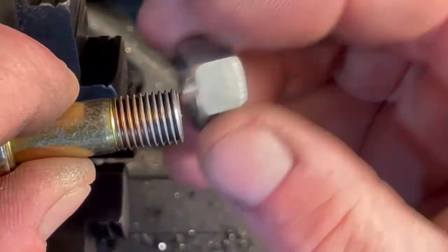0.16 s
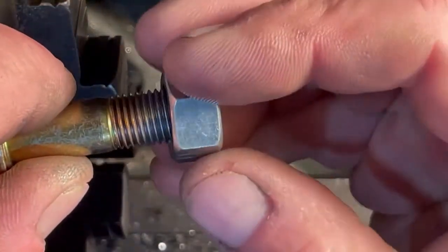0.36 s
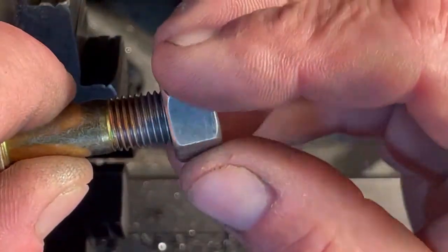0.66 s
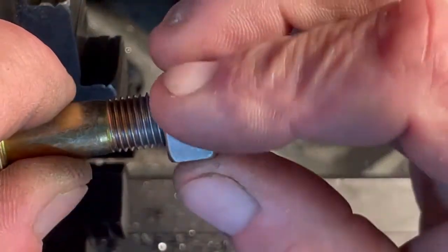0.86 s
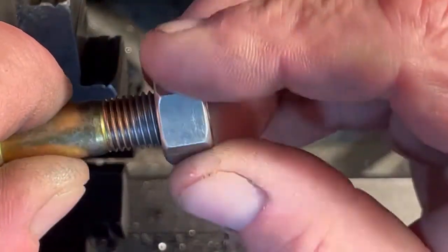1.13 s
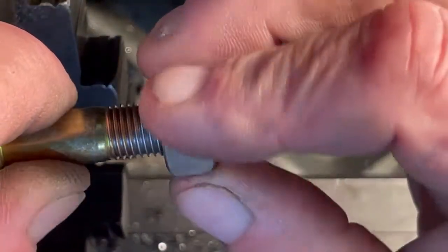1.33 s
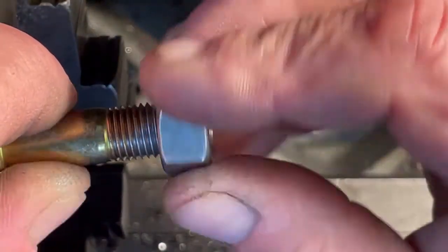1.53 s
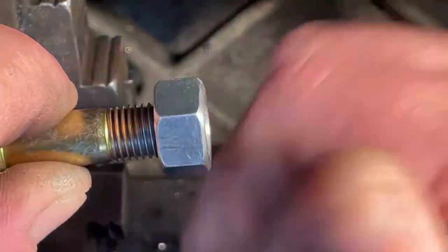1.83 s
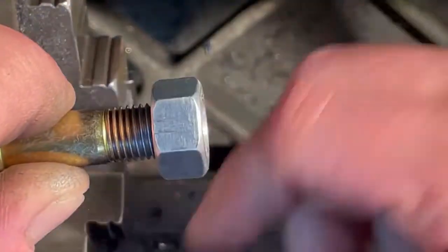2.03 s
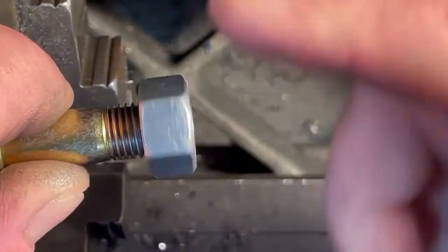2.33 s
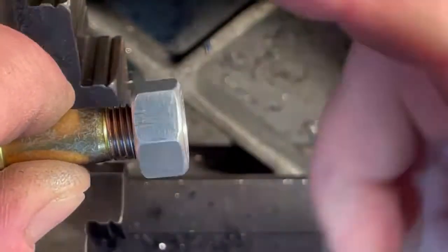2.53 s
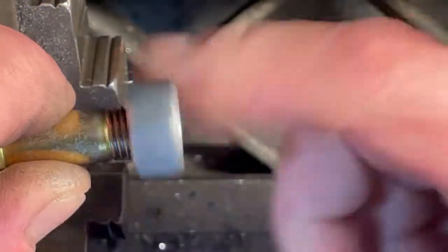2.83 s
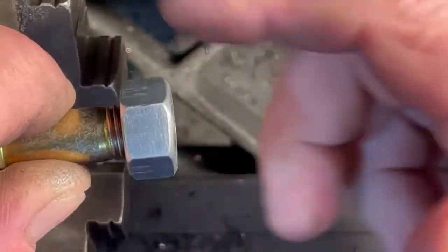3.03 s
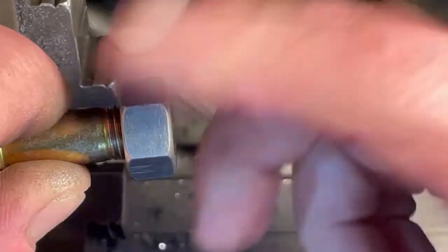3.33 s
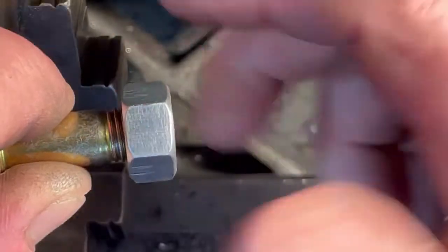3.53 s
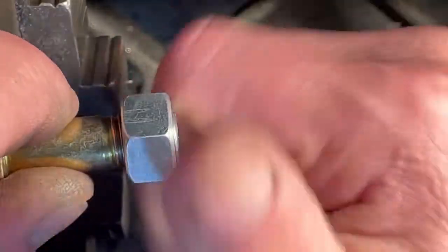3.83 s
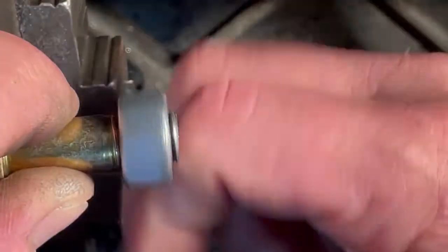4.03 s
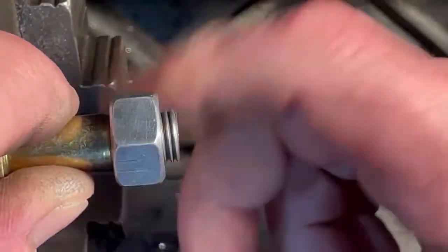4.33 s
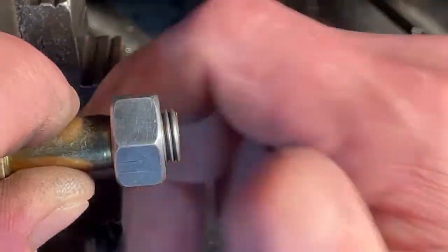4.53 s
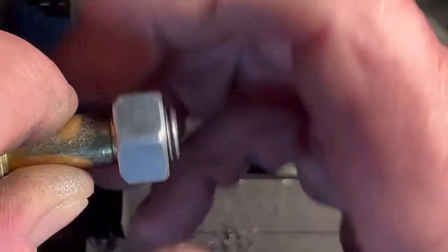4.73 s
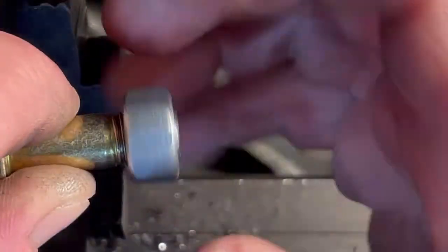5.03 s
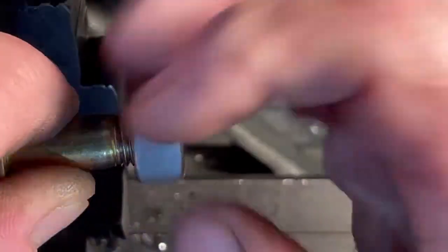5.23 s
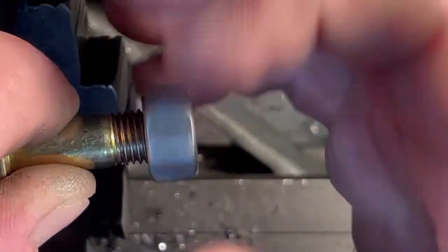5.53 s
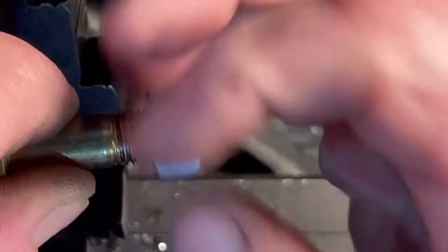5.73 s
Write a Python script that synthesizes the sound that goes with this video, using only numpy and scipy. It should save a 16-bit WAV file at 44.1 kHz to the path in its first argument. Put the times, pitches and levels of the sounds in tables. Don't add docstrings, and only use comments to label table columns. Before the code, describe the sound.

A quiet workshop with low, slightly swelling machine rumble and soft airy noise runs throughout. Close by, at 0.2-0.3 s, fingers set a small steel nut on a bolt with three quick, bright clicks. Barely audible ticks follow until a clear hard click at 1.4 s and a softer one at 1.55 s. At about 1.8 s the first short scratchy flicks come; from 2.2 to 2.95 s they become strong, raspy zips, skin skidding over the flats, thread chattering, the loose nut slapping with high metallic ticks. From 3 to 3.7 s it is nearly still, with faint brushes. Between 3.7 and 4.9 s there are light clicks, soft flicks at 4.05, 4.25 and 4.7 s, and a thin high sliding hiss as the nut coasts. From 4.95 s vigorous flicks return, clustering at 5.0, 5.25, 5.45 and 5.75 s, with rattling slaps and a slight buzz near the end. Reflections are short and dry.

```python
import sys
import numpy as np
from scipy import signal
from scipy.fft import rfft, irfft, next_fast_len
from scipy.io import wavfile
from scipy.ndimage import uniform_filter1d

SR = 44100
rng = np.random.default_rng(int(sys.argv[2]) if len(sys.argv) > 2 else 0)


def unload_audio(sound):
    columns = np.transpose(np.atleast_2d(sound))
    steps = np.round(np.clip(columns, -1, 1) * 32767)
    wavfile.write(sys.argv[1], SR, steps.astype(np.int16))


def volts(x):
    e = np.asarray(x, float) / 20
    return 10 ** e


N = 259440


def evened(x):
    return x / np.sqrt(np.mean(x ** 2) + 1e-20)


def read(points, hz):
    f, value = np.transpose(points)
    return np.interp(np.log(hz + 1), np.log(f + 1), value)


def add(mix, start_s, sound):
    part = mix[round(start_s * SR):][:len(sound)]
    part += sound[:len(part)]


def resonate(x, hz, width_hz):
    turn = np.exp(2j * np.pi * hz * np.arange(len(x)) / SR)
    r = np.exp(-np.pi * width_hz / SR)
    return 2 * (turn * signal.lfilter([1 - r], [1, -r], x / turn)).real


def ring(x, modes):
    return sum((-1) ** k * volts(db) * resonate(x, hz, width_hz)
               for k, (hz, width_hz, db) in enumerate(modes))


def steep(x, modes):
    return evened(sum((-1) ** k * volts(db) * resonate(resonate(x, hz, width_hz), hz, 7.2 * width_hz)
                      for k, (hz, width_hz, db) in enumerate(modes)))


def colour(x, spectrum):
    return irfft(rfft(x) * volts(read(spectrum, np.fft.rfftfreq(len(x), 1 / SR))), len(x))


def grit(per_s, spread_db, clump_db, clump_s):
    size = volts(spread_db * np.minimum(rng.exponential(1, N), 4))
    size = size * (rng.random(N) < per_s / SR)
    slow = signal.butter(2, 1 / clump_s, fs=SR, output="sos")
    clumps = evened(signal.sosfilt(slow, rng.standard_normal(N)))
    return evened(size * rng.standard_normal(N) * volts(clump_db * clumps))


def plateau(t, start, length, rise, fall):
    ramp = np.minimum((t - start) / rise, (start + length + fall - t) / fall)
    return np.sin(.5 * np.pi * np.clip(ramp, 0, 1)) ** 2


# frequency in Hz, width in Hz, level in dB.
DRONE = [(58.35, 9.4, -56), (94.2, 14.4, -54.5), (130, 8.6, -65.5), (244.5, 15, -69.5)]
FOLLOW = [1.15, 0.15, 0.39, -0.2]
# time in seconds, level of the lowest hum in dB.
SWELL = [(0.0, -57.5), (0.43, -51), (0.44, -58.5), (2.57, -54), (2.96, -64.5), (3.21, -51), (3.63, -68),
         (3.83, -49), (4.06, -56), (4.22, -53.5), (4.67, -54.5), (4.85, -66.5), (4.9, -48), (4.95, -68),
         (5.04, -53), (5.88, -50.5)]


def hum():
    s, lowest_db = np.transpose(SWELL)
    swell_db = np.interp(np.arange(N) / SR, s, lowest_db - lowest_db.mean())
    out = np.zeros(N)
    for (hz, width_hz, db), share in zip(DRONE, FOLLOW):
        tone = resonate(rng.standard_normal(N), hz, width_hz)
        out += volts(db + share * swell_db) * evened(resonate(tone, hz, 2 * width_hz))
    return out


# frequency in Hz, density in dB per Hz.
AIR = [(25, -11.5), (45, 0), (130, -5.5), (180, -10.5), (300, -16), (600, -22.5), (1300, -28.5),
       (2500, -30.5), (3600, -35.5), (5300, -41), (7000, -48.5), (8000, -56.5), (10000, -58.5),
       (13000, -69.5)]
# frequency in Hz, likeness from 0 to 1 (clipped).
SAME = [(60, 0.95), (140, 0.93), (330, 0.64), (600, 0.42), (1200, 0.17), (1900, 0.54), (2700, 0.87),
        (4400, 0.9893), (5200, 0.81), (6700, 1.2), (8900, 0.66), (11000, 0.6), (13500, 0.96)]


def air():
    level_db, patch_db = -54.5, 1.1
    frames, hz = N // 512 + 5, np.fft.rfftfreq(2048, 1 / SR)
    a, b, c, d, patches = rng.standard_normal((frames, 1025, 5)).T
    patches = evened(uniform_filter1d(uniform_filter1d(patches, 24, 0), 10, 1))
    same = np.clip(read(SAME, hz), 0, 1)[:, None]
    left = a + 1j * b
    right = same * left + np.sqrt(1 - same ** 2) * (c + 1j * d)
    z = np.array([left, right]) * volts(read(AIR, hz)[:, None] + patch_db * patches)
    return volts(level_db) * evened(signal.istft(z, nperseg=2048, noverlap=1536)[1][:, :N])


# time in seconds, force in dB, edge in dB, nut ring in Hz, weight on the bolt in dB.
SEATING = [(0.2304, -47, -17, 4900, 0), (0.2462, -56, -8, 4200, -6), (0.2909, -45, -1, 5550, -4.5),
           (0.516, -70.5, -26, 4150, 7.5), (0.632, -93, 21, 5500, 1), (1.311, -78, -25, 3970, 8),
           (1.4088, -38, -13, 4740, 2), (1.5427, -52, -44.5, 4948, -1.5), (1.7779, -56, -20, 5080, -1),
           (1.8054, -42.5, -4, 5560, 0.5), (2.0018, -51.5, -30, 6250, 4), (2.119, -66, -21, 4470, 1),
           (3.721, -50.5, -22, 5860, 3), (3.921, -75.5, 21, 4280, -5), (4.05, -57, -12, 4740, 4.5),
           (4.2567, -48.5, -20, 6280, 8), (4.728, -51, -10, 5430, -2), (4.9276, -60.5, -8, 4940, -3)]
# time in seconds, force in dB, edge in dB, nut ring in Hz.
SLAPS = [(2.2099, -57, -23.5, 4160), (2.229, -47, -6, 5940), (2.4069, -53, -30.5, 6236),
         (2.424, -57, 1, 4970), (2.4379, -40, -9, 6310), (2.5237, -51, -5, 5340), (2.832, -58, -19, 4380),
         (2.8649, -40.5, -30.5, 5630), (4.968, -43.5, -36, 5761), (5.0397, -59.5, -22, 3729),
         (5.1925, -62, -5, 3800), (5.22, -44, -9, 5870), (5.2451, -38.5, -12, 5800),
         (5.2746, -53, -18, 4480), (5.3382, -56, -17.5, 4100), (5.365, -66, -17, 3700),
         (5.4034, -68, -19, 3971), (5.413, -54, -2, 5500), (5.456, -43, -19, 5900),
         (5.6016, -59.5, -40, 4130), (5.627, -67, -28, 4150), (5.7107, -44, -13, 6440),
         (5.7204, -38.5, -18, 5770), (5.75, -40, -16, 4950)]
# frequency in Hz, width in Hz, level in dB.
STRUCK = [(1755, 270, -12.5), (2260, 260, -12), (2580, 360, 6.5), (2650, 47, -10), (3300, 780, -7.5)]
# frequency in Hz, width in Hz, level in dB.
NUT = [(4150, 55, 0), (4830, 220, 5.5), (5630, 68, -9.5), (6270, 116, 8.5), (7200, 330, -11)]
# frequency in Hz, level in dB.
SKIN = [(1000, -14), (3000, -9), (4500, -3), (6200, 2), (7800, 0), (9600, -11), (12000, -30), (16000, -34)]
# frequency in Hz, level in dB.
CRACK = [(5000, -27), (7500, 2), (10000, 5.5), (13000, -4.5), (16000, -12)]


def knocks():
    out, t = np.zeros(N), np.arange(2600) / SR
    tick = 1. * (np.arange(2600) == 40)
    damping = volts(-60 * t / 0.08)
    bolt, crack = steep(tick, STRUCK), colour(tick, CRACK)
    wide = ring(tick, NUT) + volts(-2.0) * colour(tick, SKIN)
    rattle_shape = volts(-60 * t / 0.031) * np.minimum(t / 0.00048, 1)
    for s, force_db, edge_db, spot_hz, *weight_db in SEATING + SLAPS:
        nut = volts(-10.0) * evened(wide) + steep(wide, [(spot_hz, 800, 0)])
        drive = rng.standard_normal(len(t)) * rattle_shape + 9 * np.roll(tick, 4)
        parts = signal.fftconvolve(drive[None], damping * [bolt, nut, crack], axes=1)[:, :len(t)]
        parts = parts / abs(parts).max(1, keepdims=True)
        bolt_db = 2 - 8 * (spot_hz / 1000 - 5) + sum(weight_db)
        add(out, s - .0009, volts(force_db + np.array([bolt_db, 1.5, edge_db + 7.5])) @ parts)
    return out


# peak in seconds, rise in seconds, skin in dB, spin in dB, coast in seconds.
FLICKS = [(1.78, 0.022, -55.5, -60.5, 0.0067), (1.808, .005, -62, -67, .025), (2.01, 0.011, -67, -71, 0.14),
          (2.119, .015, -74.5, -74, 0.0067), (2.24, 0.04282, -50, -57, 0.19),
          (2.299, 0.06, -56.5, -59.5, 0.023), (2.428, 0.0098, -53, -59, 0.01),
          (2.464, 0.073, -54, -56.5, 0.061), (2.525, 0.094, -64, -55.5, 0.021),
          (2.649, 0.026, -56.5, -63.5, 0.11), (2.868, 0.033, -51.5, -57, 0.077),
          (2.888, 0.013, -58, -57.5, 0.12), (2.929, .03, -66, -61, 0.077), (3.727, .008, -72, -63.5, .015),
          (4.049, 0.047, -60, -65, 0.24), (4.249, 0.0581, -63, -65.5, 0.19),
          (4.714, 0.14, -62.5, -67, 0.031), (4.982, 0.041, -50, -58.5, 0.14),
          (5.028, 0.09, -57.5, -60.5, 0.13), (5.25, 0.061, -50.5, -53, 0.062),
          (5.278, 0.0076, -62, -61.5, 0.15), (5.455, 0.016, -63, -72, 0.01),
          (5.489, 0.041, -47, -55.5, .13), (5.746, 0.05, -51.5, -60, 0.14)]
# peak in seconds, half length in seconds, level in dB.
BRUSHES = [
    (1.882, 0.052, -76),
    (3.424, 0.024, -79),
    (3.66, .01, -90),
    (3.813, 0.047, -69.5),
    (3.922, 0.013, -79),
    (4.024, .02, -75),
    (5.194, 0.0061, -62),
    (5.417, 0.015, -67.5),
    (5.456, 0.034, -67),
]
# start in seconds, length in seconds, level in dB.
VICE_BUZZ = (5.56, .4, -72)


def stroke_levels(t):
    rise_db, skin_fall_db_per_s, ridge_fall_db_per_s = 29.5, 550, 820
    peak, rise, skin_db, spin_db, coast = np.transpose(FLICKS)[:, :, None]
    before_db = rise_db * np.maximum(peak - t, 0) / rise
    after = np.maximum(t - peak, 0)

    def speed(slower):
        return np.clip(1 - after / (1.57 * slower * coast), 0, 1) ** 2.48

    spin = volts(spin_db - before_db) * speed(0.98)
    vice_db = -64 + 0.66 * (spin_db + 59)
    vice = volts(vice_db - before_db) * speed(0.79)
    drag = volts(skin_db - before_db - skin_fall_db_per_s * after)
    ridges = volts(skin_db - 11.5 - 1.27 * before_db - ridge_fall_db_per_s * after)
    ridges = np.maximum(ridges, volts(-26) * spin)

    peak, half, brush_db = np.transpose(BRUSHES)[:, :, None]
    brush = volts(brush_db - 21.5 * abs((t - peak) / half) ** 1.65).max(0)
    start, length, buzz_db = VICE_BUZZ
    buzz = volts(buzz_db) * plateau(t, start, length, 0.027, .05)
    spin = spin.max(0)
    return [np.hypot(vice.max(0), buzz), spin, drag.max(0) + volts(0.5) * brush,
            ridges.max(0) + brush, volts(-7) * spin]


# frequency in Hz, width in Hz, level in dB.
VICE = [(1642, 273, -3), (1760, 253, -1)]
# frequency in Hz, width in Hz, level in dB.
BOLT = [(2508, 123, 3.5), (2930, 300, -0.5), (3210, 104, 2.5), (3430, 156, -3), (3916, 270, -6.5)]
# frequency in Hz, level in dB.
FINE = [(5000, -15), (7500, 2), (10000, -4), (13000, -6.5), (14600, -12), (15600, -6), (16000, -35)]


def strokes():
    t = np.arange(0, N / SR, .001)
    flanks = grit(3000, spread_db=2.23, clump_db=1.9, clump_s=0.0047)
    skin = grit(7500, spread_db=2.9, clump_db=2.0, clump_s=.005)
    skid = evened(colour(skin, SKIN)) + volts(-5.0) * evened(ring(skin + flanks, NUT))
    ticks = evened(colour(flanks, SKIN)) + volts(-2.5) * evened(ring(flanks, NUT))
    ridges = colour(skin, FINE)
    layers = [steep(flanks, VICE), steep(flanks, BOLT), evened(skid), evened(ridges), evened(ticks)]
    return sum(np.interp(np.arange(N) / SR, t, level) * layer
               for level, layer in zip(stroke_levels(t), layers))


# start in seconds, length in seconds, level in dB.
GLIDE = [
    (3.332, 0.26, -91),
    (3.76, 0.32, -86),
    (3.938, 0.16, -92),
    (4.026, 1, -77.5),
    (4.613, 0.12, -81.5),
]
# frequency in Hz, level in dB.
SLIDE = [(5000, -6.5), (6500, -4.5), (8000, -13), (11000, -2.5), (13000, -9), (13900, -33), (16000, -57)]
# frequency in Hz, width in Hz, level in dB.
SING = [(9440, 31, -10), (10160, 200, -6), (11360, 100, -11), (12100, 500, -1)]


def glide():
    t = np.arange(N) / SR
    level = sum(volts(db + 4) * plateau(t, s, length, rise=0.04, fall=0.12) for s, length, db in GLIDE)
    rub = grit(20000, spread_db=1.7, clump_db=0.92, clump_s=0.033)
    hiss = evened(colour(rub, SLIDE)) + volts(-9.0) * evened(ring(rub, SING))
    return level * evened(hiss)


def shop(x, shared=0.6):
    t60_s, level_db = 0.072, -12
    t = np.arange(round(t60_s * SR)) / SR
    taps = rng.standard_normal((3, len(t))) * volts(-60 * t / t60_s) * (t > .002)
    taps = signal.lfilter([1], [1, -.8], taps)
    taps = shared * taps[0] + np.sqrt(1 - shared ** 2) * taps[1:]
    return volts(level_db) * signal.fftconvolve(x[None], taps / np.linalg.norm(taps[0]), axes=1)[:, :N]


def scene():
    close = knocks() + strokes() + glide()
    return hum() + air() + close + shop(close)


def low_pass(x):
    return signal.sosfilt(signal.butter(12, 16480, fs=SR, output="sos"), x)


# frequency in Hz, left lead in radians.
PORTS = [(300, 0), (1000, -.4), (2000, .35), (3200, -.4), (4000, -.1), (4600, -.15), (5500, -1),
         (6300, -1.3), (6980, -3.1), (8500, -3.1), (9400, -1.9), (11300, 0), (14200, 2.5), (15900, 4.4)]
# frequency in Hz, left over right in dB.
TILT = [(60, 0), (200, 1.7), (700, .3), (1900, 2.6), (3000, 1.4), (4000, 0), (15000, .2)]


def record(dry):
    size = next_fast_len(N)
    hz = np.fft.rfftfreq(size, 1 / SR)
    half = np.exp(.5j * read(PORTS, hz)) * volts(.5 * read(TILT, hz))
    bass_cut = 1 / (1 + (35 / (hz + 1)) ** 6)
    ported = irfft(rfft(dry, size) * bass_cut * np.array([half, 1 / half]), size)[:, :N]
    return low_pass(ported)


dry = scene()
out = record(dry)
unload_audio(out)
```